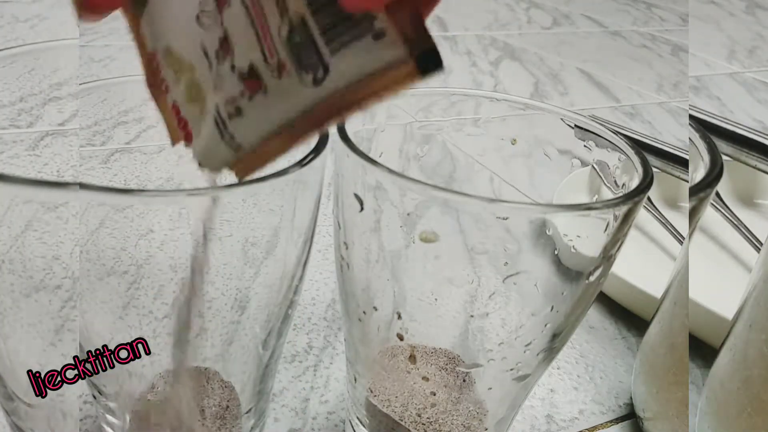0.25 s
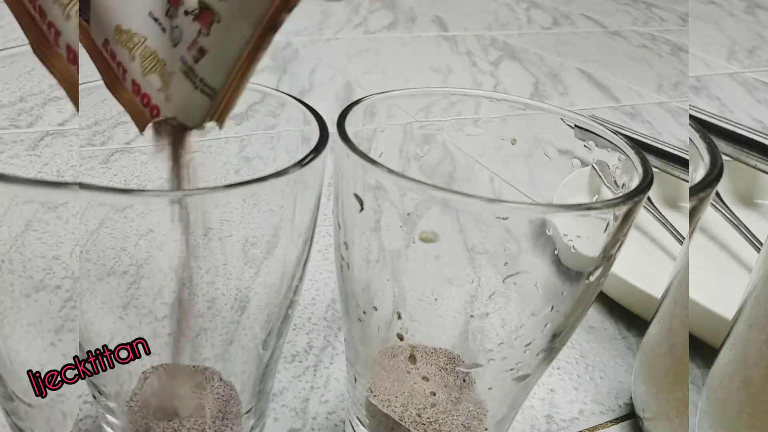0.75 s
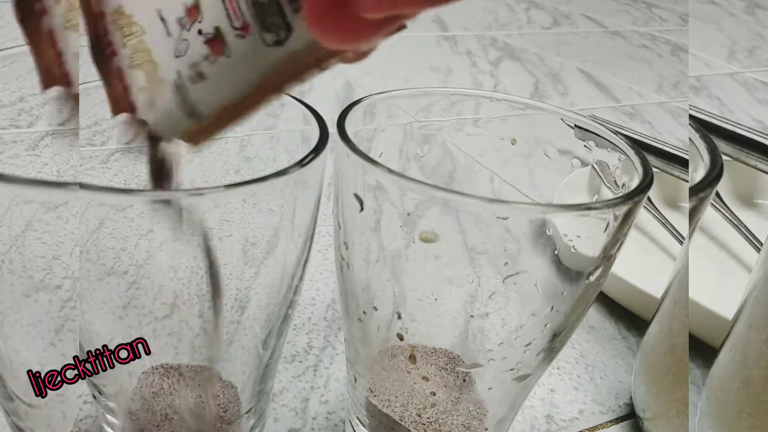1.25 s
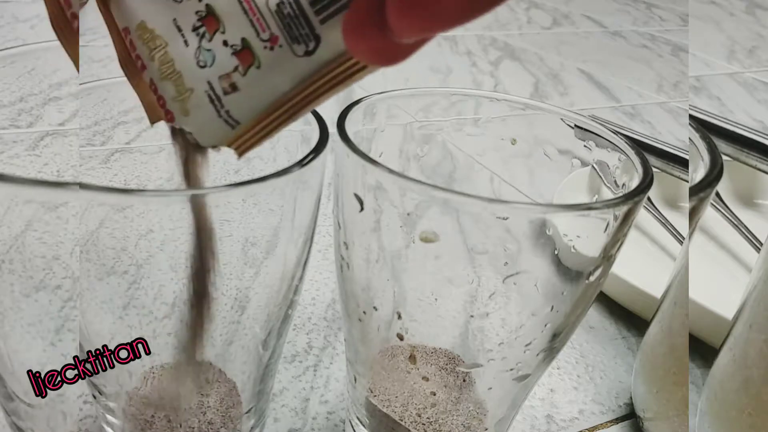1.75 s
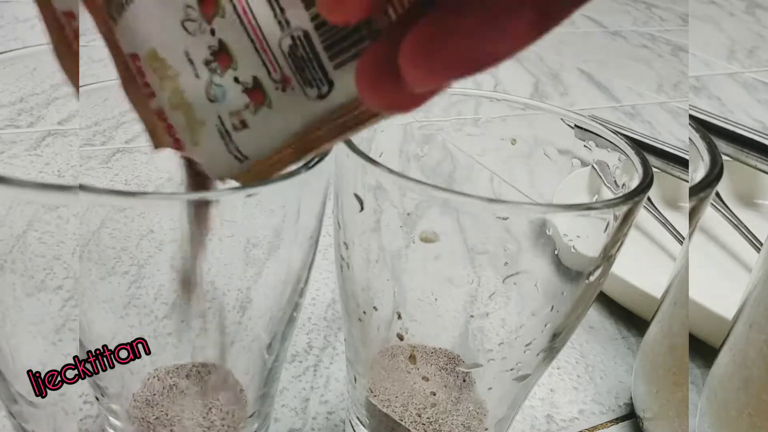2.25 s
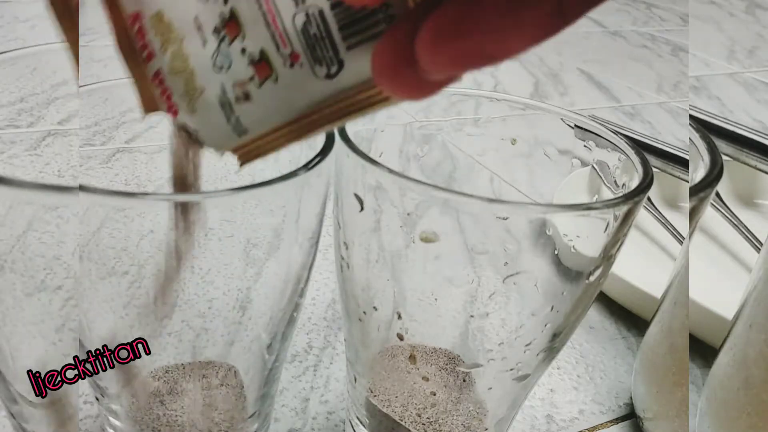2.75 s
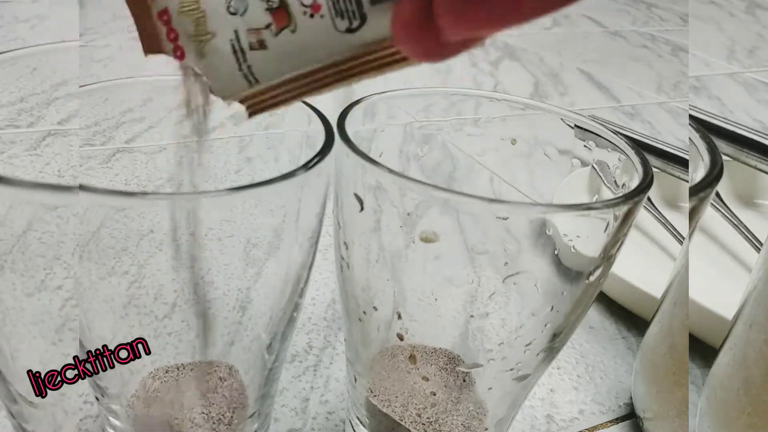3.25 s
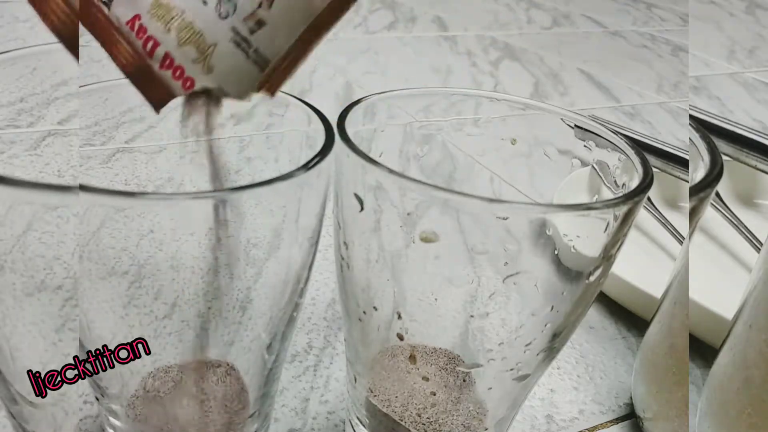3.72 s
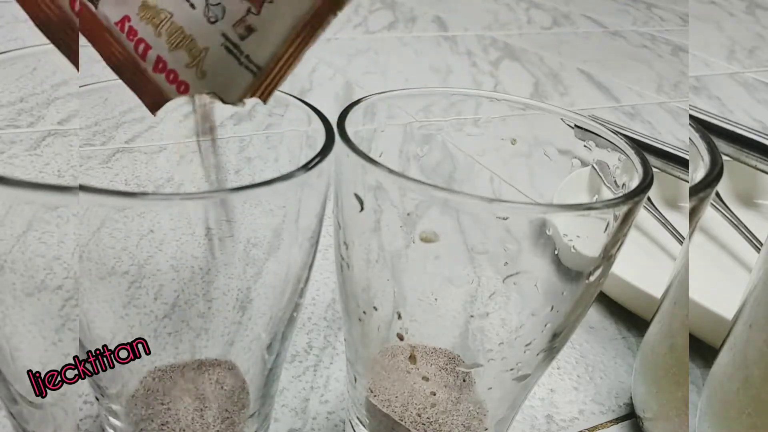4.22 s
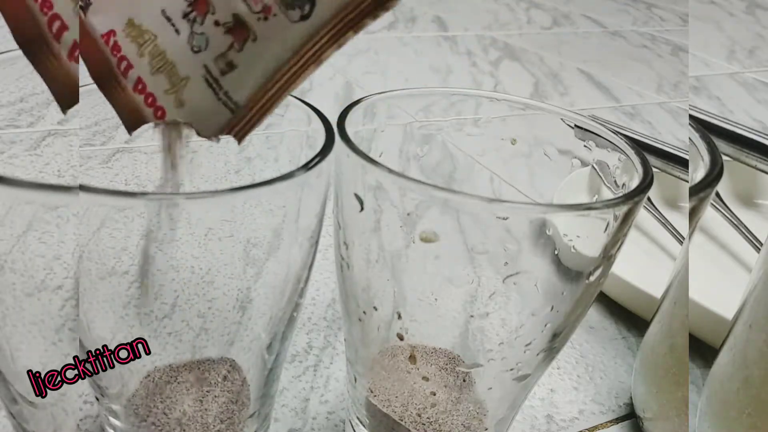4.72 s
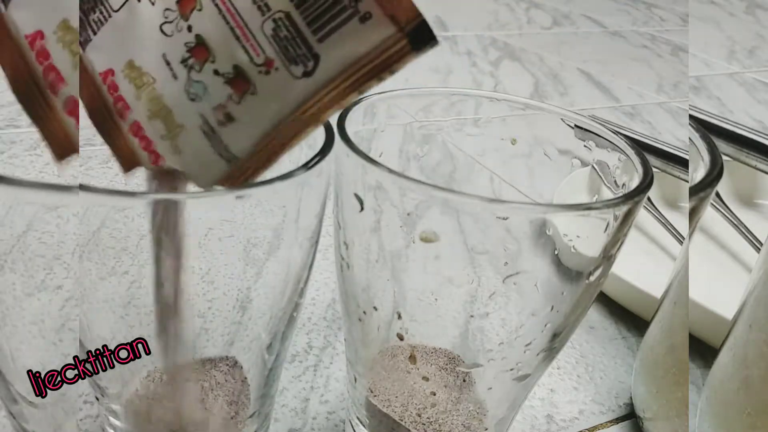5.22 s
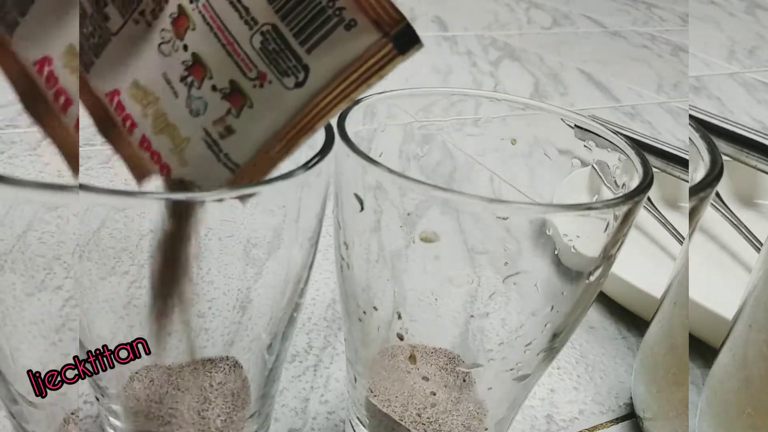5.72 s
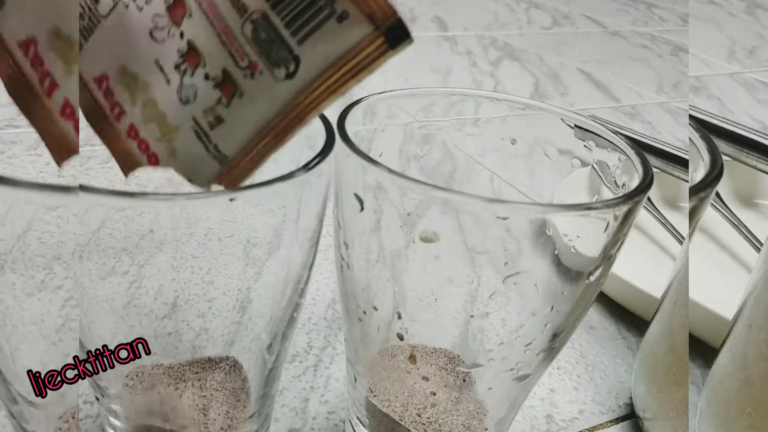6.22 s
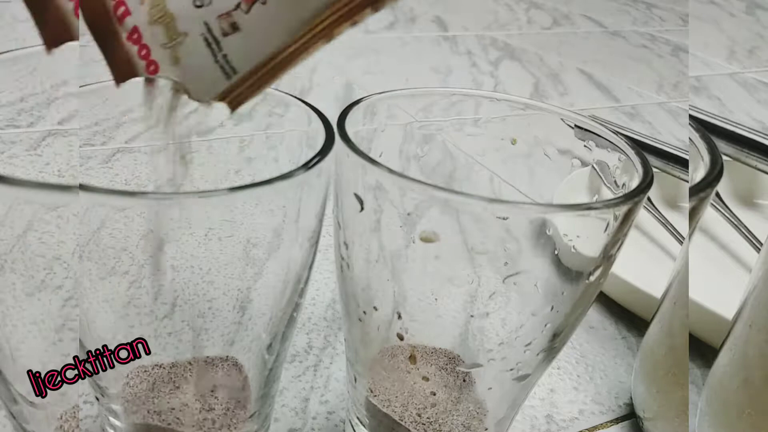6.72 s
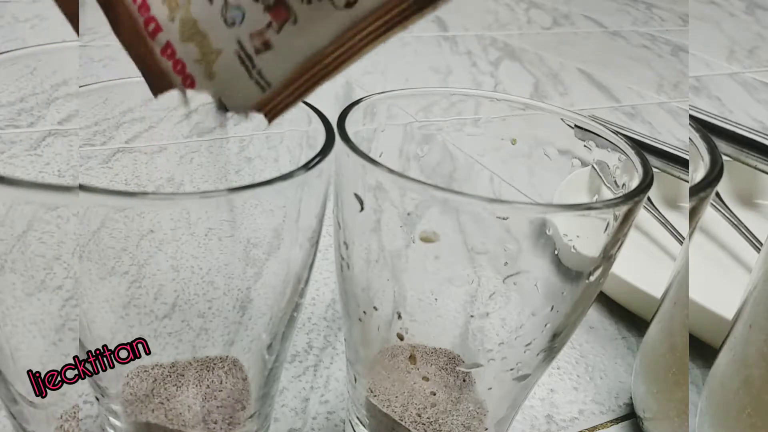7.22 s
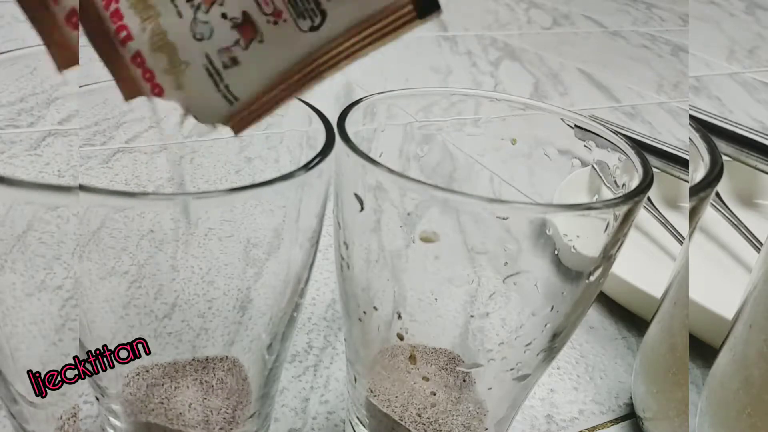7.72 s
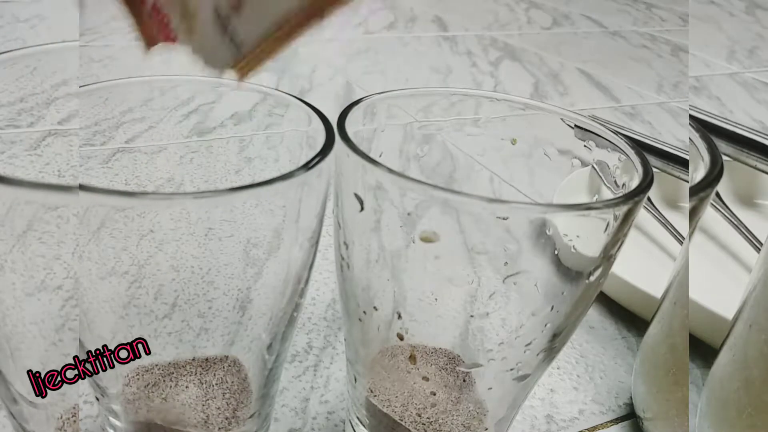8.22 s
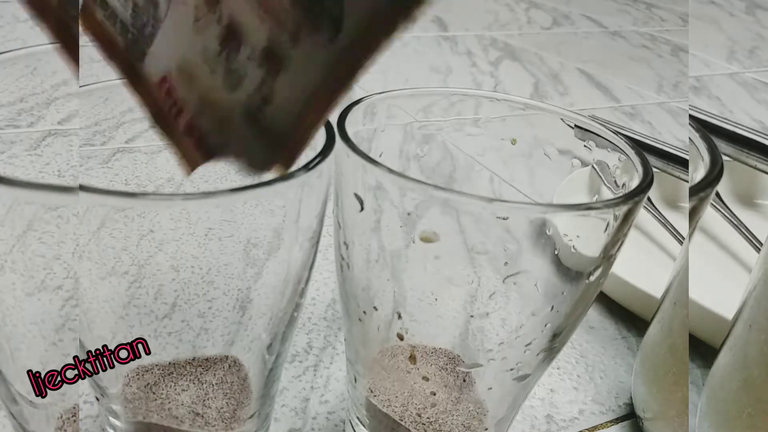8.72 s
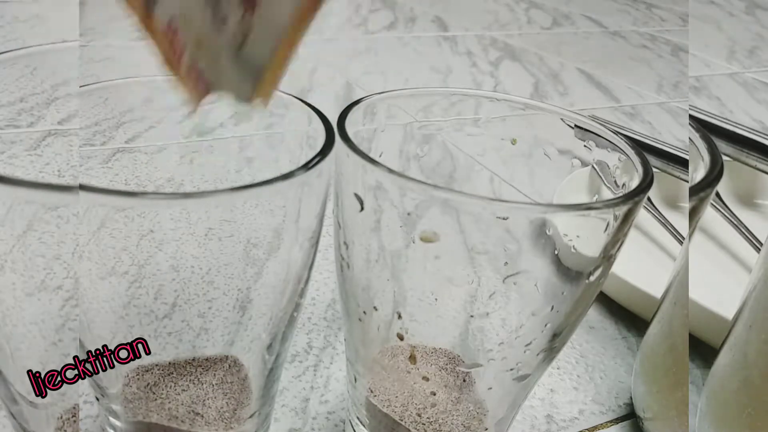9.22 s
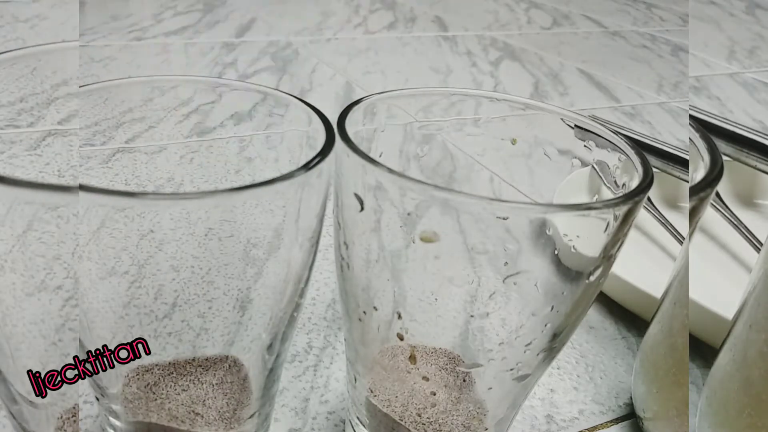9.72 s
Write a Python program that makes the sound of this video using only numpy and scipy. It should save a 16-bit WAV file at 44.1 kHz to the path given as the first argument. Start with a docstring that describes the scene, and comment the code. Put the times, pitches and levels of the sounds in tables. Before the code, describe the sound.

A paper sachet of instant coffee is shaken over a glass, very close to the microphone in a quiet kitchen. From the start, quick irregular jerks throw granules against the paper in dry, bright, crackling bursts, and creases pop with sharp ticks, loudest in the first two seconds. A thin hiss of powder trickles into the glass in between, clearest during the first second. At about 2.1 seconds the sachet meets the rim with a soft knock and the glass rings faintly and briefly. The shaking and crackling continue unevenly until about 8 seconds. Then come weaker jerks with a few crease pops, and two light touches on the rim at about 8.6 and 9.2 seconds, each ringing faintly. A last soft trickle of powder swells near 9.8 seconds. Throughout, a low electrical hum throbs unevenly underneath, with a slight rumble and faint room noise.

```python
"""A quiet kitchen, two microphone ports close to a paper sachet of coffee granules shaken over a glass.
From the start each jerk throws granules against the paper in a crackling burst, creases pop and powder
trickles in between, while a mains hum throbs underneath. Just after 2 s the sachet meets the rim and the
glass rings faintly. The shaking goes on until about 8 s; then come weaker jerks and two more touches
on the rim, and a last trickle of powder swells near 9.8 s."""
import sys
import numpy as np
from scipy import signal
from scipy.fft import rfft, irfft, next_fast_len
from scipy.io import wavfile
from scipy.ndimage import uniform_filter1d, map_coordinates

SR = 44100
rng = np.random.default_rng(int(sys.argv[2]) if len(sys.argv) > 2 else 0)


def unload_wav(signal):
    """Save mono or channel-first audio to the path in sys.argv[1] as 16-bit WAV at rate SR, clipped to [-1, 1]."""
    wavfile.write(
        sys.argv[1],
        SR,
        np.round(np.clip(np.atleast_2d(signal).T, -1, 1) * 32767).astype(np.int16),
    )


N = 438794
T = np.arange(N) / SR
LEFT_LAG = 9  # samples by which close sounds reach the left port later


def amp(db):
    """Gain of a level in dB."""
    return 10 ** (np.asarray(db) / 20)


def unit(x):
    """x at rms 1."""
    return x / np.sqrt(np.mean(x ** 2) + 1e-20)


def along(points, hz):
    """Read (frequency, value) points at hz on a log axis."""
    freqs, values = np.transpose(points)
    return np.interp(np.log(hz + 1), np.log(freqs + 1), values)


def filtered(x, response):
    """x through a gain that depends on frequency."""
    size = next_fast_len(N + 8192)
    return irfft(rfft(x, size) * response(np.fft.rfftfreq(size, 1 / SR)), size)[..., :N]


def coloured(x, spectrum):
    """x shaped by a spectrum table, at rms 1."""
    return unit(filtered(x, lambda hz: amp(along(spectrum, hz))))


def wobble(rate):
    """A smooth random curve, rate knots a second."""
    return map_coordinates(rng.standard_normal(int(N * rate / SR) + 4), [T * rate])


def patched(x, depth_db, window=256, patch=(6, 5)):
    """x at rms 1 with random patches of gain, (bins, frames) wide: deep dips and capped tops."""
    spectra = signal.stft(x, nperseg=window)[2]
    field = rng.standard_normal(spectra.shape[1:])
    field = uniform_filter1d(uniform_filter1d(field, patch[0], 0), patch[1], 1)
    gain = amp(depth_db * np.minimum(unit(field), 1.5))
    return unit(signal.istft(spectra * gain, nperseg=window)[1][:, :N])


def grains(spread_db, likeness):
    """Dense contacts of very unequal size; both ports hear each, the left later and by its own path."""
    size = amp(np.minimum(spread_db * rng.exponential(size=N), 16))
    paths = rng.standard_normal((3, N))
    turn = np.arcsin(likeness)
    right = size * paths[0]
    left = size * (np.sin(turn) * paths[0] + np.cos(turn) * paths[1])
    return unit(np.array([np.roll(left, LEFT_LAG), right]))


# How alike the background is at the two ports: (frequency [Hz], likeness [0..1])
PORT_LIKENESS = [(60, 0.74), (300, 0.79), (640, 0.61), (1400, 0)]

def ambient_noise(spectrum, depth_db, patch):
    """Patchy coloured noise of rms 1, alike at both ports only in the bass."""
    def mid_side_gain(hz):
        turn = np.arccos(along(PORT_LIKENESS, hz)) / 2
        return amp(along(spectrum, hz)) * [np.cos(turn), np.sin(turn)]
    noise = patched(rng.standard_normal((2, N)), depth_db, window=1024, patch=patch)
    mid, side = filtered(noise, mid_side_gain)
    return unit(np.array([mid + side, mid - side]))


# Room tone: (frequency [Hz], relative level [dB])
ROOM_SPECTRUM = [(100, -42), (330, -14), (420, 11), (520, 5.5), (1000, 1.5), (2000, -7.5), (4000, -14),
                 (16000, -87)]

def room():
    """Quiet broad noise of the kitchen, all around the microphone."""
    return amp(-55.5) * ambient_noise(ROOM_SPECTRUM, depth_db=4.5, patch=(3, 4))


# Colour of the rumble: (frequency [Hz], relative level [dB])
RUMBLE_SPECTRUM = [(25, -42), (60, -14), (100, 0), (150, -11.5), (200, 0.5), (250, -16.5), (300, -6.5),
                   (360, -26.5), (500, -79)]
# Its slow rise and fall: (time [s], level [dB])
RUMBLE_LEVELS = [(0.0, -56), (0.55, -62.5), (0.88, -46), (1.11, -78), (1.33, -57), (1.47, -49),
                 (2.85, -51.5), (3.18, -56.5), (3.49, -45.5), (3.71, -62.5), (4.82, -49.5), (5.43, -65.5),
                 (5.82, -49), (7.54, -55), (7.87, -51), (8.12, -60.5), (8.64, -50), (9.95, -52)]

def rumble():
    """A lumpy rumble under the hum, strongest near 100 and 200 Hz."""
    lumps = ambient_noise(RUMBLE_SPECTRUM, depth_db=12, patch=(3, 3))
    throb_db = 5 * np.minimum(wobble(13), 1)
    return amp(np.interp(T, *np.transpose(RUMBLE_LEVELS)) + throb_db) * lumps


# Runs of hum swells: (first swell [s], last swell [s], pitch [Hz], level [dB])
HUM_RUNS = [(0.138, 0.139, 94, -36.5), (0.32, 0.32, 195, -46), (0.42, 0.419, 99, -31.5),
            (0.595, 1.05, 100.5, -37), (1.284, 1.569, 97, -38.5), (1.35, 1.351, 203, -40),
            (1.83, 1.831, 101.6, -32.5), (2.115, 2.186, 94.5, -31.5), (2.274, 2.275, 200, -44.5),
            (2.475, 2.474, 103, -35), (2.891, 3.05, 102, -36), (3.136, 3.136, 198, -35),
            (3.331, 3.332, 214, -37.5), (3.524, 3.604, 108, -37), (4.139, 4.139, 98, -39),
            (4.36, 4.52, 94, -54), (4.22, 4.42, 207, -49), (4.595, 4.635, 206, -48),
            (4.669, 4.898, 98, -41), (4.901, 4.9, 188, -37), (4.99, 5.15, 101, -42),
            (5.154, 5.155, 262, -41), (5.682, 5.847, 98, -36), (6.307, 6.396, 95, -39),
            (6.706, 6.85, 94, -38), (6.892, 6.893, 216, -40), (7.238, 7.237, 101, -40.5),
            (7.797, 7.95, 194, -38.5), (7.928, 7.928, 89, -38), (8.369, 8.525, 103, -44.5),
            (8.714, 8.875, 93.5, -38.5), (9.045, 9.12, 98, -45), (9.193, 9.193, 108, -42),
            (9.34, 9.493, 95, -35), (9.375, 9.374, 220, -37.5), (9.648, 9.717, 94, -38.5)]

def mains_hum(gap_s=0.077):
    """In the background, the mains hum and its overtones come and go in runs of evenly spaced swells."""
    lead = SR // 10
    out, t = np.zeros((2, N + SR)), np.arange(-lead, lead) / SR
    for first, last, hz, db in HUM_RUNS:
        for peak_s in np.linspace(first, last, round((last - first) / gap_s) + 1):
            phase = rng.random()
            port_phase, glide, detune, size_db = rng.normal(0, [0.074, 4.3, 0.058, 0.59])
            swell = np.sqrt(2) * amp(db + size_db - 12.3 * np.abs(t / 0.019) ** 1.07)
            cycles = hz * (1 + detune) * t * (1 + glide * t * 100 / hz) + phase
            tone = np.sin(2 * np.pi * (cycles + port_phase * np.array([[.5], [-.5]])))
            out[:, round(peak_s * SR):][:, :len(t)] += swell * tone
    return out[:, lead:lead + N]


# The sachet meets the rim: (time [s], knock level [dB], ring level [dB])
RIM_TAPS = [(2.107, -26, -38), (2.24, -52, -51), (8.566, -47, -42.5), (9.17, -55, -49)]
# Knock of paper on the rim: (frequency [Hz], relative level [dB])
KNOCK_SPECTRUM = [(300, -22), (520, 4.5), (660, -3.5), (820, 3), (1100, -7), (1450, 1.5), (1900, -7),
                  (2500, -4), (3300, -15.5), (4500, -53)]

def glass(ring_hz=1857, ring_s=0.41):
    """The soft sachet squashes on the rim for a moment and leaves the glass wall ringing."""
    out, t = np.zeros(N + SR), np.arange(SR // 2) / SR
    squash = coloured(rng.standard_normal(N), KNOCK_SPECTRUM)
    push = (t / 0.0076) ** 2 * np.exp(2 - t / 0.0099 * 2)
    ring = amp(-60 * t / ring_s) * (1 - np.exp(-t / 0.0083)) * np.sin(2 * np.pi * ring_hz * t)
    for start_s, knock_db, ring_db in RIM_TAPS:
        at = slice(round(start_s * SR), round(start_s * SR) + len(t))
        out[at] += amp(knock_db) * push * squash[at] + amp(ring_db) * ring
    return np.array([np.roll(out, LEFT_LAG), out])[:, :N]


# Flow of falling powder: (time [s], level [dB])
POWDER_LEVELS = [(0, -47.5), (.64, -48), (1.2, -53), (2, -59), (4.3, -60), (4.7, -57), (5.1, -59.5),
                 (7, -58.5), (7.7, -76), (7.95, -65), (8.54, -58), (8.62, -47), (8.85, -54), (9.05, -66),
                 (9.5, -66), (9.77, -47.5), (9.95, -53.5)]
# Its hiss: (frequency [Hz], relative level [dB])
POWDER_SPECTRUM = [(1500, -2.5), (4000, -7.5), (8000, 2.5), (16000, -8.5)]

def powder():
    """A thin stream of grains sifts onto the heap in the glass."""
    flicker_db = 2.5 * wobble(25)
    sift = patched(grains(spread_db=1.5, likeness=0.031), depth_db=4.5)
    return amp(np.interp(T, *np.transpose(POWDER_LEVELS)) + flicker_db) * coloured(sift, POWDER_SPECTRUM)


# Creases popping close to the ports: (time [s], level [dB], centre pitch [Hz])
CREASE_POPS = [(0.0532, -17.5, 4200), (0.189, -15, 3170), (0.2647, -25, 2770), (0.393, -7, 7500),
               (0.435, -16, 8200), (0.5685, -15.5, 3100), (0.623, -19.5, 3050), (0.6857, -20, 5200),
               (0.7353, -18.5, 3200), (0.849, -25, 2460), (0.879, -11.5, 8750), (0.9065, -21, 2980),
               (0.9304, -22, 3400), (1.0978, -9, 6650), (1.301, -15, 3900), (1.357, -8, 6570),
               (1.5433, -12.5, 6600), (1.7022, -18, 6900), (1.7586, -18.5, 3850), (2.678, -16.5, 5020),
               (3.13, -15.5, 4500), (3.328, -10, 4450), (3.4272, -15.5, 6800), (3.5006, -13.5, 3740),
               (3.7852, -23, 4320), (3.9441, -19.5, 6950), (4.468, -23.5, 4400), (4.7565, -27, 7030),
               (4.8965, -20, 6900), (5.1547, -9, 6800), (5.1934, -18, 6340), (5.67, -22.5, 4440),
               (5.6934, -18, 5430), (5.917, -16.5, 5670), (6.119, -14.5, 7000), (6.5274, -11.5, 4940),
               (6.5755, -18, 4150), (6.731, -17.5, 7100), (7.102, -19.5, 3530), (7.274, -21, 4450),
               (7.4836, -16.5, 8900), (7.6077, -23, 3000), (7.6195, -13, 6950), (7.661, -22, 4100),
               (7.7977, -16.5, 4080), (8.358, -26, 2800), (8.5705, -18, 2980), (8.7625, -19.5, 2930),
               (8.9613, -18.5, 2620), (9.1753, -16.5, 3540), (9.3513, -26, 3200)]
# Granules on paper, here and in the jerks below: (frequency [Hz], relative level [dB])
GRANULE_SPECTRUM = [(1200, -19.5), (2500, -2), (4000, -0.5), (8000, 5.5), (11000, 2.5), (16000, -11.5)]

def creases(modes=7):
    """A crease flips with a crack; the paper rings briefly at chance pitches and shakes granules loose."""
    out, t = np.zeros((2, N + SR)), np.arange(SR // 15) / SR
    scatter = coloured(rng.standard_normal((2, N + SR)), GRANULE_SPECTRUM)
    attack = 1 - np.exp(-t / 0.00063)
    for start_s, db, centre_hz in CREASE_POPS:
        at = slice(round(start_s * SR), round(start_s * SR) + len(t))
        mode_hz = centre_hz * np.exp(rng.normal(0, 0.17, (modes, 1)))
        phase = rng.normal(0, 0.067, (modes, 1)) + rng.normal(0, 0.18, (2, modes, 1))  # shared + per port
        ring = np.sin(2 * np.pi * (mode_hz * t + phase)).sum(1) / np.sqrt(modes) * amp(-60 * t / 0.0086)
        noise = uniform_filter1d(rng.standard_normal(len(t)), size=3) * np.sqrt(3)
        crack = 0.41 * noise * amp(-60 * t / 0.0023)
        pouch_hz = 1500 * np.exp(rng.normal(0, 0.26))  # the pouch answers low
        pouch = 0.5 * np.sin(2 * np.pi * pouch_hz * t) * amp(-60 * t / 0.0047)
        loose = centre_hz / 6000 * amp(-15.5 - 60 * t / 0.056) * scatter[:, at]
        out[:, at] += amp(db) * attack * (ring + crack + pouch + loose)
    return np.array([np.roll(out[0], LEFT_LAG), out[1]])[:, :N]


# Jerks of the sachet: (peak time [s], level [dB], width [ms], brightness [dB])
SACHET_JERKS = [(0.052, -35, 20, 1), (0.156, -28.5, 36, 5.5), (0.263, -28, 26.5, -2.5),
                (0.396, -22, 39, 4.5), (0.44, -16.5, 17.5, -0.5), (0.571, -24.5, 19, 4),
                (0.684, -39, 32, -8), (0.737, -28.5, 26, 3), (0.783, -42, 11, -10), (0.883, -29.5, 32, 4.5),
                (0.925, -35, 47, -0.5), (1.058, -43, 16, 6), (1.102, -27, 27.5, -0.5),
                (1.31, -24.5, 51, -5.5), (1.355, -21.5, 23, 2), (1.541, -30, 26, -0.5),
                (1.642, -32.5, 46, -7.5), (1.704, -30, 19.5, -9), (1.766, -38, 27, -14),
                (1.869, -42.5, 29, -2), (1.95, -48.5, 34, 5), (2.076, -36, 64, 0), (2.256, -44, 40, 0),
                (2.35, -39.5, 7, -7), (2.459, -30.5, 46, -0.5), (2.553, -47.5, 23, 8), (2.694, -35, 50, 1),
                (2.923, -34, 24, 0.5), (3.137, -29, 32, 2.5), (3.333, -21.5, 27, 1.5),
                (3.423, -36, 23, -15.5), (3.516, -40.5, 59, -7), (3.776, -39, 45, 5.5),
                (3.953, -38, 32, 7.5), (4.144, -41, 44, 9), (4.466, -34, 41, 3), (4.639, -40, 19, 4),
                (4.673, -38, 32, 7.5), (4.759, -27.5, 14, -1), (4.899, -33.5, 33.5, 0.5),
                (5.022, -42, 19, -1), (5.157, -23.5, 23, -1.5), (5.195, -28, 31, -1.5),
                (5.267, -45.5, 17, -5), (5.412, -36, 48, -5), (5.504, -46.5, 49, -5),
                (5.69, -38.5, 63, -2.5), (5.915, -23.5, 27.5, -1), (6.003, -39.5, 28, -5),
                (6.117, -32.5, 42, -3.5), (6.462, -44.5, 48, 5), (6.528, -31.5, 21, 12.5),
                (6.573, -38.5, 27, 5), (6.729, -37.5, 21, 6), (6.896, -38, 29, -15),
                (7.104, -41.5, 43, -7.5), (7.202, -44, 28.5, -16), (7.27, -38, 28, 11.5),
                (7.374, -38, 35, -9), (7.488, -21, 21, 6.5), (7.555, -40.5, 20, 0), (7.619, -34, 39, -8.5),
                (7.666, -33, 51, 0.5), (7.803, -27, 30, -0.5), (7.883, -44, 30, -5), (8.366, -46, 28, -3),
                (8.573, -41.5, 26, -8), (8.772, -47.5, 22, -16), (8.972, -48.5, 39, -18),
                (9.18, -48, 31, -11), (9.355, -45.5, 32, -13), (9.383, -38, 19, -5)]
# Body of the paper pouch: (frequency [Hz], relative level [dB])
POUCH_SPECTRUM = [(300, -6), (550, -1.5), (900, -3), (1500, -1.5), (2300, -15), (3500, -18.5)]

def jerk_envelopes(rise_share=0.49):
    """Each jerk is a swarm of hits that swells fast and thins out: envelopes of body, lows and highs."""
    lead = SR // 10
    power, t = np.zeros((3, N + SR)), np.arange(-lead, SR // 3) / SR
    stragglers = (t > 0) * amp(-17.5 - 60 * t / 0.35)  # granules sliding back down the pouch
    for peak_s, db, width_ms, bright_db in SACHET_JERKS:
        from_peak = np.abs(t) * 1000 / (width_ms * np.where(t < 0, rise_share, 1 - rise_share))
        swarm = amp(-9.1 * from_peak ** np.where(t < 0, 1.35, 1.1)) + stragglers  # blunt rise, pointed fall
        body_db = -41 + 0.83 * (db + 30) - 0.66 * bright_db  # hard, dull jerks have the most body
        gains = amp([body_db, db - bright_db / 2, db + bright_db / 2])
        power[:, round(peak_s * SR):][:, :len(t)] += np.outer(gains, swarm) ** 2
    return np.sqrt(power)[:, lead:lead + N]


def sachet(split_hz=5500):
    """Right at the microphone, granules rattle against the paper and sound the body of the pouch."""
    body_env, low_env, high_env = jerk_envelopes()
    hits = grains(spread_db=3.0, likeness=0.019)
    # the creased paper rings at other pitches from moment to moment
    hits = patched(hits, depth_db=4.5, window=512, patch=(3, 4)) * amp(1.53 * wobble(220))
    running_power = np.abs(uniform_filter1d(np.mean(hits ** 2, 0), SR // 40))
    hits = hits / np.sqrt(running_power + 1e-9)  # evened out, so the jerks set the level
    rattle = coloured(hits, GRANULE_SPECTRUM)
    highs = filtered(rattle, lambda hz: 1 / (1 + (split_hz / (hz + 1)) ** 5))
    body = coloured(hits, POUCH_SPECTRUM)
    # below the hiss the hits come in fewer, harder clumps
    clumps = unit(amp(3.07 * np.minimum(wobble(160), 2)))
    return high_env * highs + clumps * (low_env * (rattle - highs) + body_env * body)


def scene():
    """Sachet and glass up close, the kitchen behind, as they reach the two ports."""
    return sachet() + creases() + powder() + glass() + mains_hum() + rumble() + room()


# Colour of the microphone ports: (frequency [Hz], left minus right [dB])
PORT_BALANCE = [(100, 0.5), (300, -2), (2400, -1.5), (4200, -7), (6400, -2), (9000, -5), (15000, 5.5)]

def record(dry, top_hz=16000):
    """Each port colours the sound in its own way; the microphone cuts off steeply above top_hz."""
    def response(hz):
        balance_db = along(PORT_BALANCE, hz) * np.array([[.5], [-.5]])
        cut_db = np.clip((hz - top_hz) / 8, 0, 120)
        return amp(balance_db - cut_db)
    return filtered(dry, response)


dry = scene()
out = record(dry)
unload_wav(out)
```